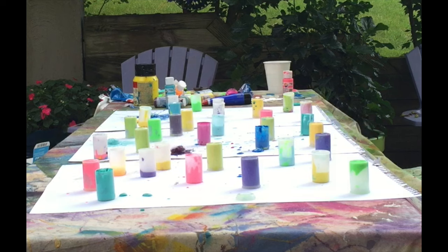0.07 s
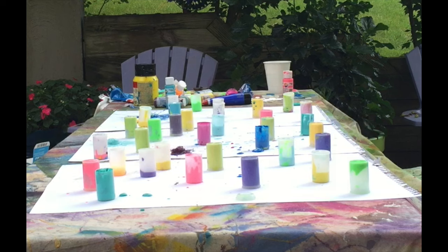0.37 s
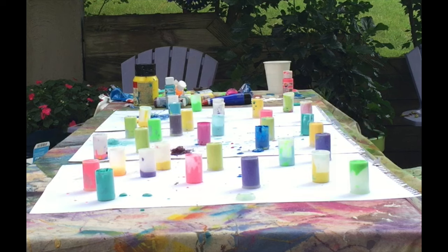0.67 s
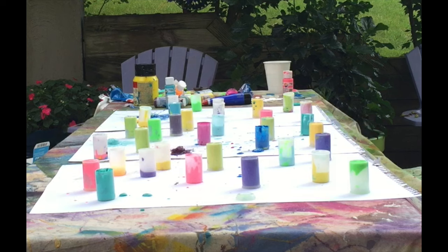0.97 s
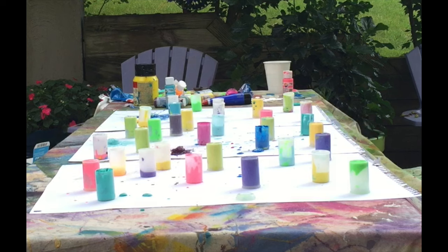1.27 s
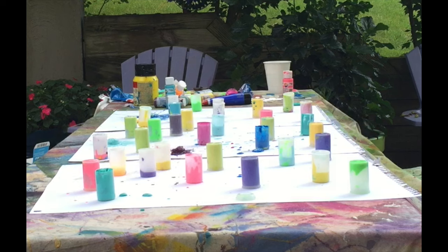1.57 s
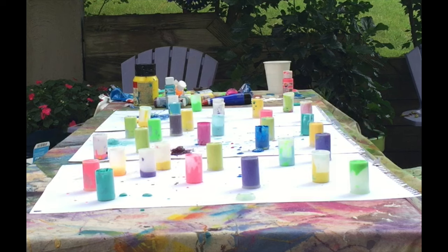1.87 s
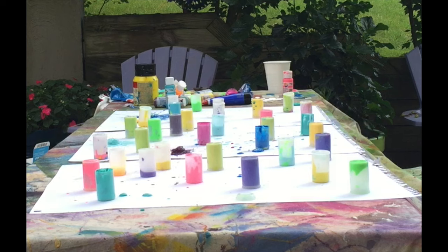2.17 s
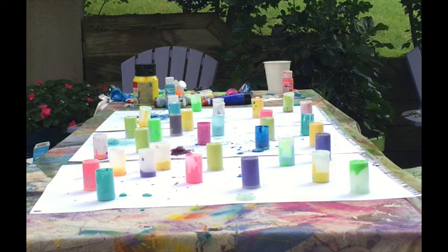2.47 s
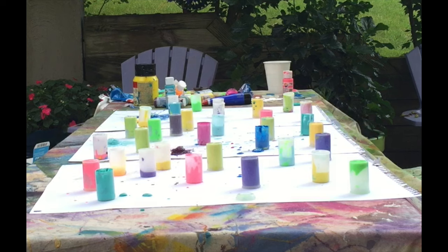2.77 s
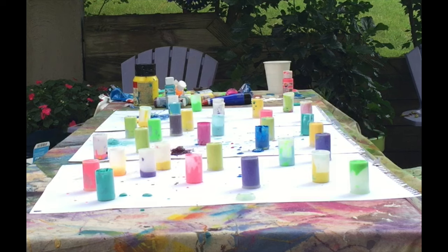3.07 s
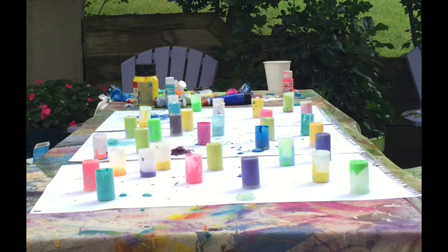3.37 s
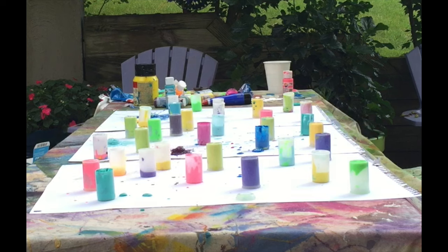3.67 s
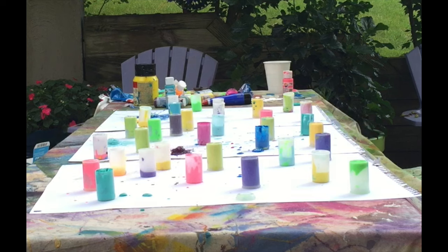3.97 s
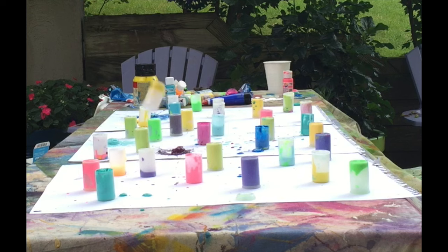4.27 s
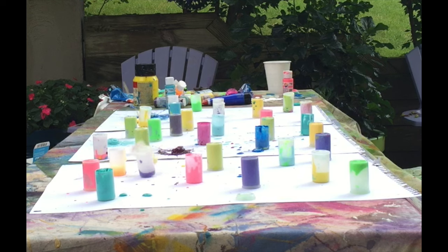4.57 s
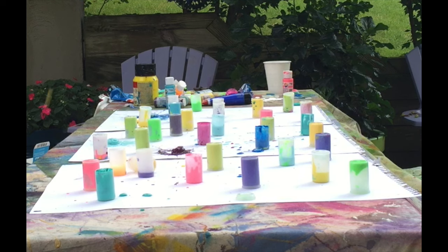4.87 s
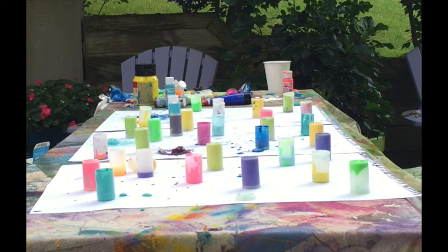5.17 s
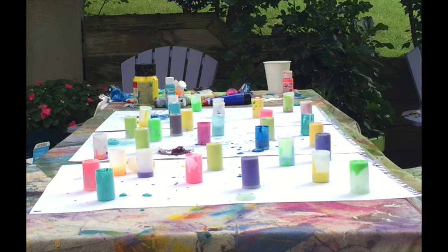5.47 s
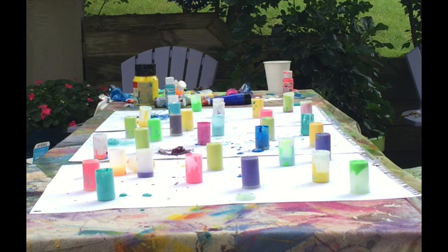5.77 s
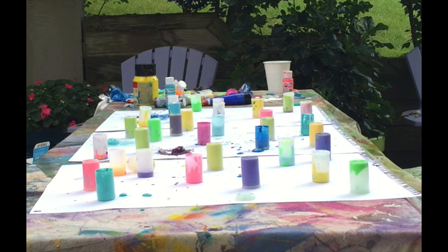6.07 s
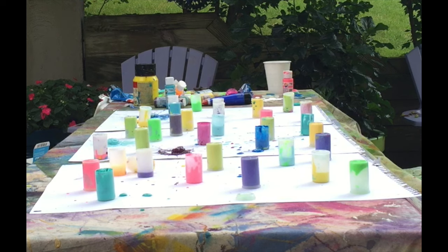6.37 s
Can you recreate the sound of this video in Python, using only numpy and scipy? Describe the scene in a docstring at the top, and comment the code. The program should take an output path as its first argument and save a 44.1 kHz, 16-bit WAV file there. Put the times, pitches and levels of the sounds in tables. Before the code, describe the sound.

In a quiet yard with faint cicadas and far-off birds, plastic canisters burst open one at a time near the microphone. The first cracks hollowly, then all sound briefly cuts out. A second pop sends a cap clattering across the table. The biggest follows with a distorted thump of gas, then caps land and paint ticks faintly on paper. After a small final pop, only insects, air and a thin tone remain.

```python
"""A film canister on a garden table blows its cap over a hiss of cicadas and far-off birds: the seal
cracks, the cavity rings hollow and the fences throw it back. All sound drops out for a moment.
A second pop follows and its cap bounces on the table while birds trill, then whistle. The biggest
pop shoves gas into the microphone and overloads it; caps land and flecks of paint tick on paper.
After one last faint pop, only the cicadas, a low rumble of air and a thin tone remain."""
import sys
import numpy as np
from scipy import signal
from scipy.fft import rfft, irfft, next_fast_len
from scipy.io import wavfile
from scipy.ndimage import uniform_filter1d

SR = 44100
rng = np.random.default_rng(int(sys.argv[2]) if len(sys.argv) > 2 else 0)


def dump_mix(stems):
    """Bounce the given channels to the path in sys.argv[1] as a 16-bit WAV at rate SR."""
    frames = np.atleast_2d(stems).T  # one column per channel
    limited = np.clip(frames, -1, 1)  # hard clip at full scale
    pcm = np.round(limited * 32767).astype(np.int16)
    wavfile.write(sys.argv[1], SR, pcm)


N = 291501
TIME = np.arange(N) / SR

# canisters popping: (time [s], ring level [dB], open pitch [Hz], ring t60 [s], starts flat by [0-1],
# ring delay [s], gas rush [dB], crack level [dB], crack tilt [dB/octave], reverb send [dB],
# far echo delay [s], far echo level [dB])
POPS = [(0.0272, 4.5, 1100, .022, .6, .0013, -38, -4.5, -1.3, -7.8, .0255, -12),
        (1.6958, 1.5, 1512, .034, .04, .0002, -14, -5.5, .6, -11.5, .0343, -11),
        (4.167, -50, 2500, .014, .1, .0003, -53, -35, -2, -2, .0096, -15),
        (4.1943, 10, 1630, .018, .76, .00018, -23, -4, -2, -3, .0265, -10),
        (6.2878, -31.5, 2730, .032, .25, .0001, -49, -24.5, 2, -7, .0275, -4)]
# tone colour of the seal's crack: (frequency [Hz], level [dB])
SEAL_SPECTRUM = [(100, -12), (700, -4), (1800, 1), (2900, 1), (3800, 0.5), (4700, 2), (7000, -6.5),
                 (8500, -3.5), (11000, -10), (15500, -15.5)]
# gas from the biggest pop hitting the microphone: (time [s], level [dB], decay time [s])
GAS_BLAST = (4.1937, 2.4, .05)
# caps landing and bouncing: (time [s], strength [dB], knock pitch [Hz], relative cap ring [dB])
CAP_LANDINGS = [(1.857, -17.5, 1325, -19), (2.016, -28, 1020, -13), (2.03, -19, 1200, -24),
                (2.128, -33, 1500, -9), (2.159, -37, 1660, -18), (2.184, -22.5, 1460, -19),
                (2.305, -35, 1150, -14), (2.343, -28.5, 1550, -20), (2.445, -39, 1440, -17),
                (4.551, -13.5, 1490, -30), (4.643, -39, 1430, -16), (5.607, -36, 720, -28),
                (5.709, -44, 659, -21)]
# resonances of a plastic cap: (frequency [Hz], level [dB], t60 [s])
CAP_MODES = [(1250, 0.5, 0.054), (1543, 1, 0.1), (1695, 0.5, 0.044), (2744, -4, 0.041), (3650, -14, 0.05),
             (4510, -21, 0.023), (8200, -10, .025)]
# flecks of paint hitting paper: (time [s], level [dB])
PAINT_FLECKS = [(.861, -58), (5.286, -53), (5.976, -49)]
# early decay of the yard's reverb: (frequency [Hz], t60 [s])
YARD_DECAY = [(100, 0.05), (450, .21), (1000, .22), (1600, .25), (3000, .36), (8000, 0.35), (15000, 0.34)]
# a bird's wide trills: (time [s], pitch [Hz], level [dB], trill depth [Hz])
TRILLS = [(1.559, 3800, -53, 700), (2.509, 4020, -54.5, 900), (3.689, 4130, -53.5, 920)]
# short buzzy bird chips: (time [s], level [dB])
CHIPS = [(5.376, -68), (6.149, -61)]
# one thin bird call on two pitches: (time [s], length [s], lower pitch [Hz], upper pitch [Hz],
# lower level [dB], upper level [dB], trill depth [Hz])
THIN_CALL = (.02, .42, 3300, 4880, -58.5, -63.5, 210)
# the cicada chorus: (frequency [Hz], noise density [dB])
CICADA_SPECTRUM = [(4300, -135), (5050, -108), (5550, -93), (6400, -93), (7100, -99), (7800, -107),
                   (9100, -110), (10000, -130)]
# leaves and far-off life: (frequency [Hz], noise density [dB])
GARDEN_SPECTRUM = [(300, -120), (550, -103), (900, -104), (1500, -107.5), (2500, -113), (4000, -118),
                   (6000, -135)]
# outdoor air: (frequency [Hz], noise density [dB])
AIR_SPECTRUM = [(10, -76.5), (35, -70.5), (90, -76.5), (180, -85.5), (350, -92.5), (700, -104),
                (1400, -109), (2800, -114), (4500, -114), (8500, -112), (10000, -116), (12000, -116),
                (16000, -123)]
# a thin steady tone: (pitch [Hz], level before the hush [dB], level after [dB])
THIN_TONE = (1052, -81, -71)
# the gap in all sound: (start [s], end [s])
DROPOUT = (0.878, 1.617)

HUSH_S = 6.387  # from here on, only cicadas, air and the thin tone


def pops(lift_s=.0019, attack_s=.00028, near_echo_s=.0092, near_echo_db=-14):
    """The seal cracks, gas rushes out and the cavity rings, bending up to pitch as the cap lifts."""
    out, t = np.zeros(N), TIME[:SR // 5]
    puff_time = t / .0016
    puff = 2 * puff_time * (puff_time - 2) * np.exp(-puff_time)  # one low push and pull of gas
    rush_band = signal.butter(3, [1700, 3050], "band", fs=SR, output="sos")
    for s, ring_db, hz, t60, flat, delay, rush_db, crack_db, tilt_db, send_db, far_s, far_db in POPS:
        cycles = np.cumsum(hz * (1 - flat * np.exp(-t / lift_s))) / SR
        ring = amp(ring_db) * np.sin(2 * np.pi * cycles) * fade(t, t60)
        jet = unit(signal.sosfilt(rush_band, rng.standard_normal(len(t))))
        rush = amp(rush_db) * jet * fade(t, t60=.045)
        # a strong rush also blows the cavity's octave
        octave = amp(rush_db + 6.5) * np.sin(2 * np.pi * 2 * cycles) * fade(t, t60=.033)
        body = np.zeros(len(t))
        add(body, delay, (ring + octave + rush) * (1 - np.exp(-t / attack_s)))
        seal = snap(t, .0092, tilt_db)
        spray = amp(-25) * snap(t, .058, tilt_db)
        crack = amp(crack_db) * (seal + spray)
        puff_db = -7 + 1.8 * crack_db  # the puff grows faster than the crack
        add(out, s, body + crack + amp(puff_db) * puff)
        # dull slapback from a near and a far fence, then the yard's reverb
        slap = body + amp(-11) * crack
        add(out, s + near_echo_s, amp(near_echo_db) * slap)
        add(out, s + far_s, amp(far_db) * slap)
        send = body + amp(crack_db + 10) * click(len(t), tilt_db)
        add(out, s, amp(send_db) * signal.fftconvolve(send, yard_reverb()))
    return out


def click(size, tilt_db):
    """A sharp transient of energy 1 in the colour of the seal, tilted by tilt_db per octave."""
    hz = abs(np.fft.fftfreq(size, 1 / SR))
    log_gain = np.log(amp(curve_at(SEAL_SPECTRUM, hz) + tilt_db * np.log2(hz / 3000 + .33)))
    minimum_phase = np.exp(np.conj(signal.hilbert(log_gain)))  # packs the energy at the front
    pulse = np.fft.ifft(minimum_phase).real
    return pulse / np.linalg.norm(pulse)


def snap(t, t60, tilt_db):
    """A short burst of noise in the colour of the seal."""
    envelope = fade(t, t60)
    burst = signal.fftconvolve(rng.standard_normal(len(t)) * envelope, click(len(t), tilt_db))[:len(t)]
    return burst * np.linalg.norm(envelope) / np.linalg.norm(burst)


def gas_blast(attack_s=.0012, bass_cut_hz=2.93):
    """Gas shoves the diaphragm; the input's bass cut makes it swing back slowly."""
    s, db, decay_s = GAS_BLAST
    t = np.maximum(TIME - s, 0)
    shove = -amp(db) * (1 - np.exp(-t / attack_s)) * np.exp(-t / decay_s)
    bass_cut = signal.butter(1, bass_cut_hz, "high", fs=SR)
    return signal.lfilter(*bass_cut, signal.lfilter(*bass_cut, shove))


def caps_and_paint(attack_s=.00025, thud_hz=560, lag_s=.0007, echo_s=.032):
    """A cap lands with a tick, a dead knock, a table thud and a plastic ring; paint only ticks."""
    out, t = np.zeros(N), TIME[:SR // 6]
    dull = signal.butter(4, 3400, fs=SR)
    soft_contact = 1 - np.exp(-(t / attack_s) ** 2)

    def land(s, body, tick_db):
        """Layers a bright tick on the body and mixes it in with a dull echo and the yard's reverb."""
        tick = click(len(t), tilt_db=0) + .55 * snap(t, t60=.04, tilt_db=0)
        hit = body + amp(tick_db) * tick
        add(out, s + lag_s, hit)
        add(out, s + lag_s + echo_s, amp(-21) * signal.lfilter(*dull, hit))
        add(out, s + lag_s, amp(-9) * signal.fftconvolve(hit, yard_reverb(build_s=.004)))

    for s, db, hz, ring_db in CAP_LANDINGS:
        phase = 2 * np.pi * hz * t
        knock = amp(-2) * (np.sin(phase) - .44 * np.sin(.66 * phase)) * fade(t, t60=.015)
        thud = amp(-21) * np.sin(2 * np.pi * thud_hz * t) * fade(t, t60=.02)
        ring = np.zeros(len(t))
        for mode_hz, mode_db, t60 in CAP_MODES:
            cycles = mode_hz * rng.uniform(.98, 1.02) * t + rng.random()
            ring += amp(mode_db) * np.sin(2 * np.pi * cycles) * fade(t, t60)
        body = signal.lfilter(*dull, (knock + thud) * soft_contact) + amp(ring_db) * ring * soft_contact
        land(s, amp(db) * body, tick_db=-31 + .55 * db)  # the tick grows more slowly than the knock
    for s, db in PAINT_FLECKS:
        land(s, body=0, tick_db=db)
    return out


def yard_reverb(build_s=.013, tail_db=-29, tail_t60=1.6, tail_cutoff_hz=2600):
    """Dense scatter off table, fence and hedge, then a faint dark tail from farther away."""
    hz, t, spectrum = signal.stft(rng.standard_normal(SR), SR, nperseg=256)
    early = fade(t, curve_at(YARD_DECAY, hz)[:, None])
    tail = amp(tail_db) * fade(t, tail_t60) / (1 + (hz[:, None] / tail_cutoff_hz) ** 2)
    response = signal.istft(spectrum * (early + tail), SR, nperseg=256)[1][:SR]
    response *= 1 - np.exp(-(TIME[:SR] / build_s) ** 2)
    return response / np.linalg.norm(response)


def birds(trees_t60=1.0, dry_gain=.2):
    """Distant song, smeared by the trees between the birds and the table."""
    song = whistler() + trillers()
    trees = rng.standard_normal(SR) * fade(TIME[:SR], trees_t60)
    return dry_gain * song + signal.fftconvolve(song, trees / np.linalg.norm(trees))[:N]


def whistler(lead_in_s=2.823, start_s=3.232, period_s=.515, hurry_s=.0033):
    """A soft low note leads in, then alternates with a rising slur, hurrying a little each time."""
    song = np.zeros(N)
    low_note = dict(length_s=.085, from_hz=1785, to_hz=1705, db=-66.5)
    add(song, lead_in_s, bird_note(**low_note))
    for k in range(7):
        s = start_s + k * (period_s - k * hurry_s)
        add(song, s, bird_note(.14, from_hz=1870, to_hz=2945, db=-58.5 if k == 0 else -53.5))
        add(song, s + .25, bird_note(**low_note))
    return song


def trillers(trill_s=.315, chip_hz=3930):
    """Wide buzzy trills that each close on a narrow one, two chips and a thin two-pitched call."""
    song = np.zeros(N)
    for s, hz, db, depth_hz in TRILLS:
        add(song, s, bird_note(trill_s, hz, hz, db, depth_hz))
        add(song, s + trill_s, bird_note(.18, from_hz=3540, to_hz=3650, db=db - 3.5, depth_hz=170))
    for s, db in CHIPS:
        add(song, s, bird_note(.1, chip_hz, chip_hz, db, depth_hz=400))
    s, length_s, low_hz, high_hz, low_db, high_db, depth_hz = THIN_CALL
    add(song, s, bird_note(length_s, low_hz, low_hz, low_db, depth_hz))
    add(song, s, bird_note(length_s, high_hz, high_hz, high_db, depth_hz))
    return song


def bird_note(length_s, from_hz, to_hz, db, depth_hz=0, trill_hz=31, waver=.012):
    """A swelling whistle that slides between two pitches, with an optional trill."""
    t = TIME[:round(length_s * SR)]
    slide_hz = to_hz + (from_hz - to_hz) * np.exp(-(t / (.3 * length_s)) ** 2.5)
    # the trill dwells low and flicks briefly upward
    flick = (1 + signal.sawtooth(2 * np.pi * trill_hz * t, .5)) / 2
    trill = 2 * flick ** 1.7 - .9 + .22 * drift(len(t), rate_hz=140)
    hz = slide_hz * (1 + waver * drift(len(t), rate_hz=82)) + depth_hz * trill
    envelope = np.linspace(.7, 1.2, len(t)) * signal.windows.tukey(len(t), .25)
    return amp(db) * envelope * np.sin(2 * np.pi * np.cumsum(hz) / SR)


def cicadas(peak_s=.87, period_s=1.28, swing_db=1.8, flutter=.094):
    """Many distant insects merge into a narrow hiss that swells and flutters."""
    swell_db = -.3 + swing_db * np.cos(2 * np.pi * (TIME - peak_s) / period_s)
    return noise(CICADA_SPECTRUM, N) * amp(swell_db) * (1 + flutter * drift(N, rate_hz=60))


def insect_rasps(start_s=.36, period_s=.328, half_width_s=.035, top_hz=9250, arch_hz=500, db=-72):
    """A nearer insect scrapes ten evenly paced, very high notes, each arching in pitch."""
    note_times = start_s + period_s * np.arange(10)
    envelope = sum(np.exp(-((TIME - s) / half_width_s) ** 2) for s in note_times)
    hz = top_hz - arch_hz * (1 - envelope)
    roughness = drift(N, rate_hz=200)
    return amp(db) * envelope * roughness * np.sin(2 * np.pi * np.cumsum(hz) / SR)


def garden_rustle(swell_db=1.5):
    """A soft, uneven bed of leaves and far-off life."""
    return noise(GARDEN_SPECTRUM, N) * amp(swell_db * drift(N, rate_hz=4))


def air():
    """Low outdoor rumble and a thin tone that steps up at the hush."""
    hz, before_db, after_db = THIN_TONE
    tone_db = np.where(TIME > HUSH_S, after_db, before_db)
    return noise(AIR_SPECTRUM, N) + amp(tone_db) * np.sin(2 * np.pi * hz * TIME)


def amp(db):
    """Decibels to gain."""
    return 10 ** (np.asarray(db) / 20)


def unit(x):
    """Scales to rms 1."""
    return x / np.sqrt(np.mean(x ** 2) + 1e-20)


def curve_at(points, hz):
    """Reads a breakpoint curve on a log-frequency axis."""
    point_hz, value = np.transpose(points)
    return np.interp(np.log(hz + 1), np.log(point_hz), value)


def add(mix, s, sound):
    """Mixes a sound in at s seconds."""
    part = mix[max(round(s * SR), 0):][:len(sound)]
    part += sound[:len(part)]


def noise(spectrum, size):
    """Noise shaped to a spectrum of levels in a 1 Hz band."""
    gain = amp(curve_at(spectrum, np.fft.rfftfreq(size, 1 / SR))) * np.sqrt(SR / 2)
    return irfft(rfft(rng.standard_normal(size)) * gain, size)


def fade(t, t60):
    """Falls 60 dB in t60 seconds."""
    return np.exp(-np.log(1000) * t / t60)


def drift(size, rate_hz):
    """Random wander of rms about 1, rolled off above rate_hz."""
    padded = next_fast_len(size)
    hz = np.fft.rfftfreq(padded, 1 / SR)
    spectrum = rfft(rng.standard_normal(padded)) / (1 + (hz / rate_hz) ** 4)
    return unit(irfft(spectrum, padded))[:size]


def scene():
    """The mono mix: canisters, birds and rustle cut at the hush; the bed of insects and air stays."""
    action = pops() + gas_blast() + caps_and_paint() + birds() + garden_rustle()
    return (action * (TIME < HUSH_S) + cicadas() + insect_rasps() + air())[None]


def record(dry, ceiling=.5, cutoff_hz=15900):
    """The input saturates on the loud pops, the sound drops out once and the top end is cut."""
    saturated = dry / (1 + (dry / ceiling) ** 8) ** (1 / 8)
    gap_start, gap_end = DROPOUT
    gate = uniform_filter1d(1. * ((TIME < gap_start) | (TIME > gap_end)), size=256)
    lowpass = signal.firwin(255, cutoff_hz, window=("kaiser", 9), fs=SR)
    return signal.oaconvolve(saturated * gate, lowpass[None], "same")


dry = scene()
out = record(dry)
dump_mix(out)
```